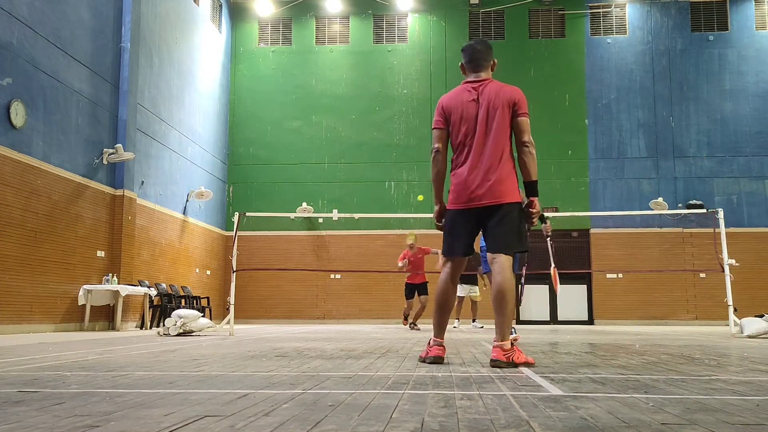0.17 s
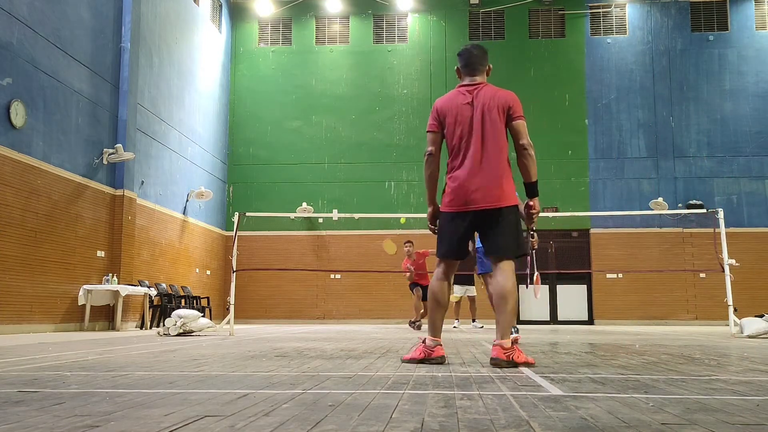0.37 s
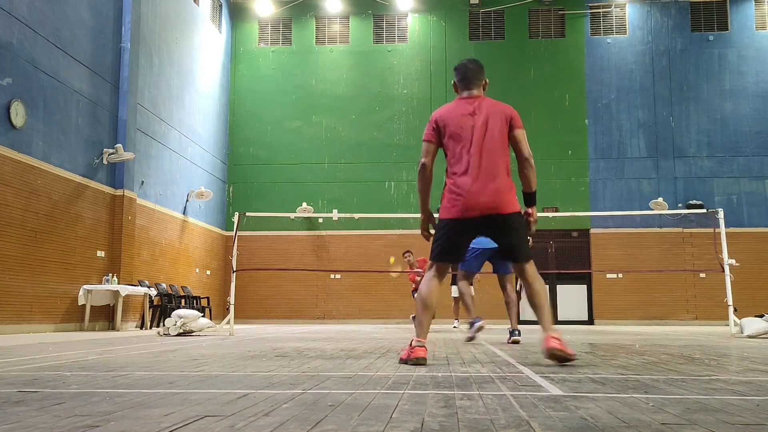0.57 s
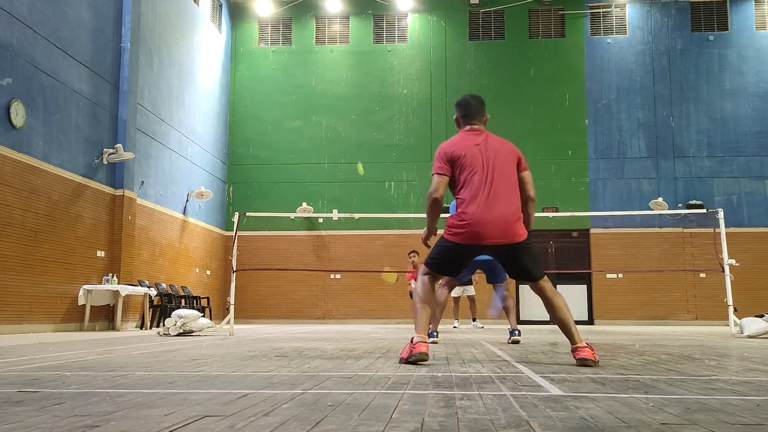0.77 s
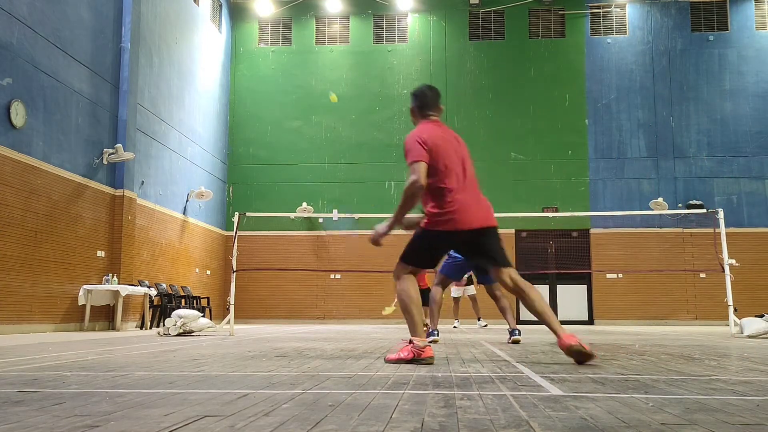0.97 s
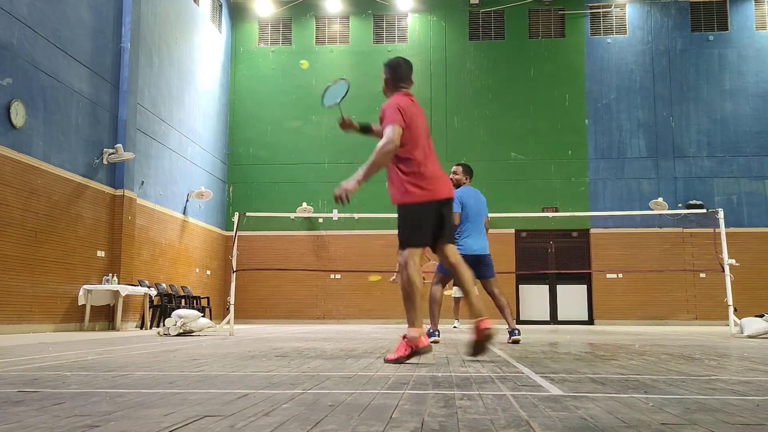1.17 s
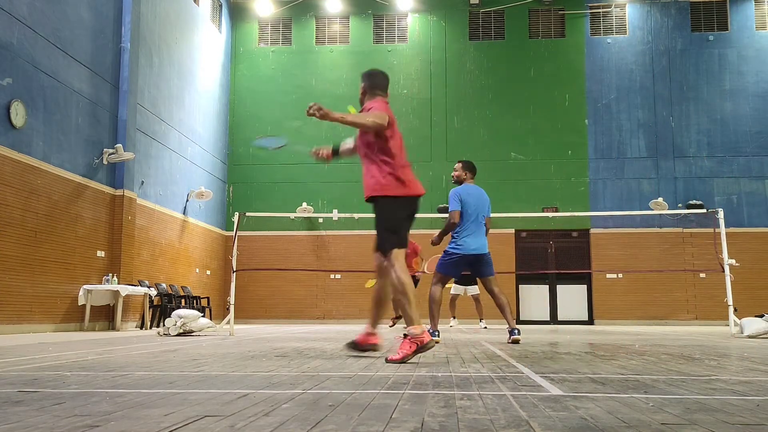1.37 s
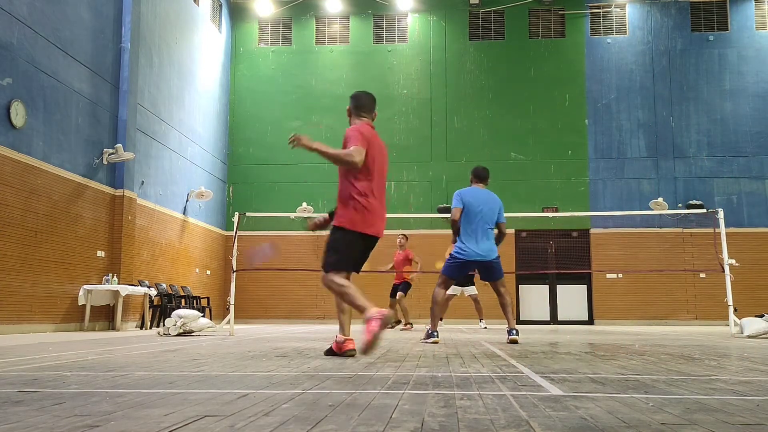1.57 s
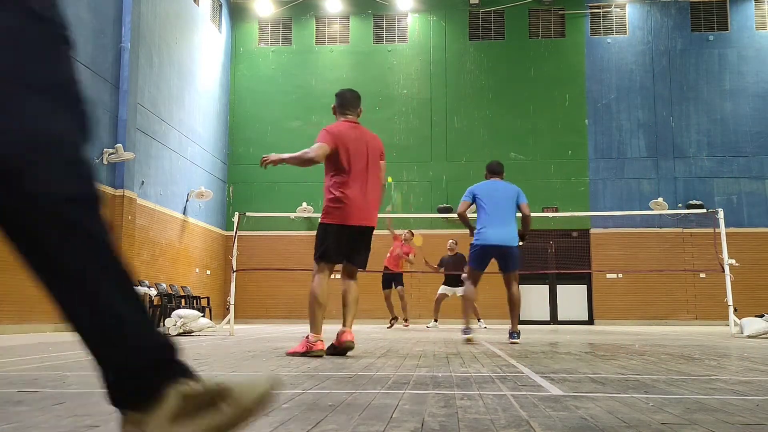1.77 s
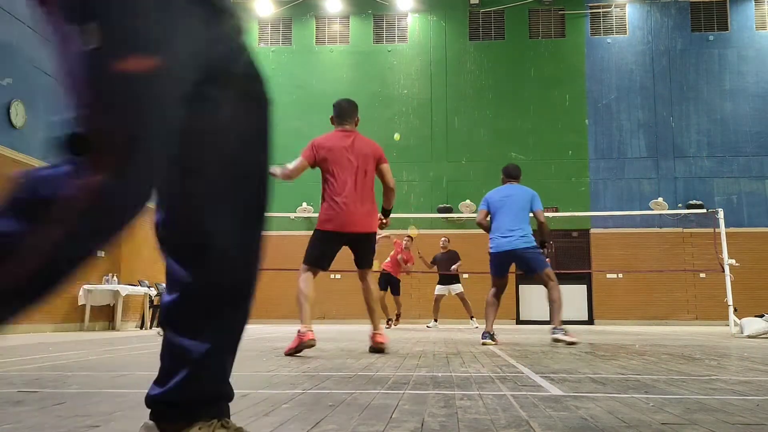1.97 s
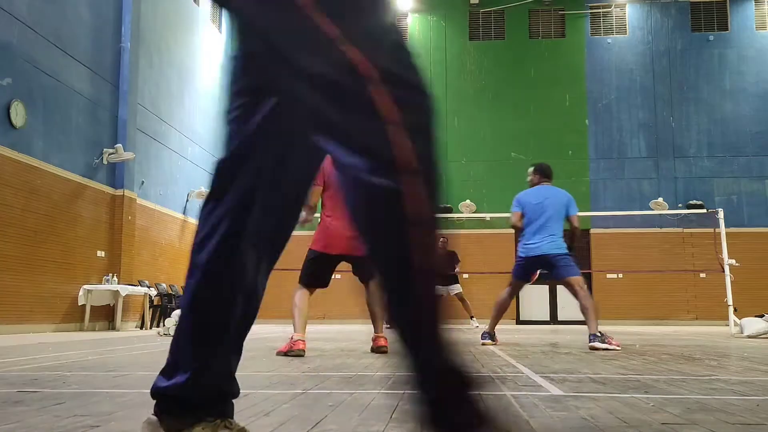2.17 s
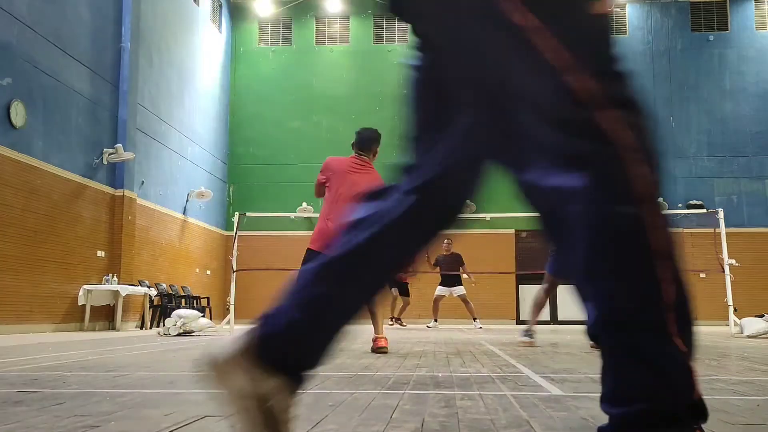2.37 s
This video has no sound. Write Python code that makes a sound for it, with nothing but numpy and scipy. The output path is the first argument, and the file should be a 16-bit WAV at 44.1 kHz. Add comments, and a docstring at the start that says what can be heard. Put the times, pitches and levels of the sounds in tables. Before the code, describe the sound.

A sharp badminton racket crack at about 0.27 seconds bounces off the far wall and lingers in a large, hard hall. Faint shoe taps and scuffs follow from 0.5 to 1.1. A second stroke, a woody pop, hits at 1.5. Footsteps thump at 1.6 to 1.7, then the strongest stamp lands close by at 2.05, with scuffing and smaller taps until the end, over low room rumble.

```python
"""Two badminton strokes in a big, hard-walled sports hall: noise cracks and decaying sines for the rackets' modes.
The far wall answers each stroke with one dull delayed copy; a long decaying noise tail is the hall's reverberation.
Shoes stamp, tap and scuff on the court: struck floor modes with slap and click noise, and swells of friction noise.
Low coloured room noise and a rumble lie underneath."""
import sys
import numpy as np
from scipy import signal
from scipy.fft import rfft, irfft
from scipy.io import wavfile
from scipy.ndimage import uniform_filter1d

SR = 44100
rng = np.random.default_rng(int(sys.argv[2]) if len(sys.argv) > 2 else 0)


def inscribe(sig):
    """Save sig as 16-bit PCM at rate SR to the path in sys.argv[1].

    A 1-D sig is mono; a 2-D sig holds one channel per row.
    Samples are clipped to [-1, 1] before scaling.
    """
    pcm = np.round(np.clip(np.atleast_2d(sig).T, -1, 1) * 32767)
    wavfile.write(sys.argv[1], SR, pcm.astype(np.int16))


N = 106986
T = np.arange(N) / SR   # time axis, s
WALL_S = .0795   # delay of the far wall's answer
FAST_RISE_S = 0.0012   # onset of the racket cracks and the sole clicks


def from_db(db):
    """Level to amplitude: 20 dB is a factor of ten."""
    return 10 ** (np.asarray(db) / 20)


def at_hz(points, hz):
    """Interpolation on a log-frequency axis, where equal steps are equal musical intervals."""
    f, value = np.transpose(points)
    return np.interp(np.log(np.maximum(hz, 1)), np.log(f), value)


def diffuse_spectrum():
    """Diffuse field: mixing independent mid and side noise sets the left-right correlation in each band."""
    # Each row: frequency in Hz, left-right correlation (1 is identical, 0 is independent).
    likeness = [(60, 1), (150, 0.99), (380, 0.86), (650, 0.53), (950, 0), (2400, 0), (15000, 0.16)]
    # Left-right balance. Each row: frequency in Hz, left minus right in dB.
    balance = [(100, -1), (300, 1), (900, -2.1), (2000, 0), (4000, 0), (15000, 0)]
    hz = np.arange(N // 2 + 1) * SR / N
    mid, side = rfft(rng.standard_normal((2, N)))
    alike = np.clip(at_hz(likeness, hz), -1, 1)
    common = np.sqrt(1 + alike) * mid
    opposed = np.sqrt(1 - alike) * side * [[1], [-1]]
    lean = from_db(at_hz(balance, hz) / 2 * [[1], [-1]])
    return hz, lean * (common + opposed) / np.sqrt(2)


def noise(spectrum):
    """Spectral shaping: white stereo noise weighted by a colour table, then scaled to rms 1."""
    hz, white = diffuse_spectrum()
    x = irfft(white * from_db(at_hz(spectrum, hz)), N)
    return x / x.std()


def blow(s, rise, t60):
    """Impact envelope: a linear rise during contact, then exponential decay by 60 dB in t60 seconds."""
    age = np.maximum(T - s, 0)
    return np.minimum(age / rise, 1) * from_db(-60 * np.maximum(age - rise, 0) / t60)


def ring(s, hz, rise, t60):
    """Modal vibration: one damped sine, its phase differing between two spaced microphones."""
    lag = np.array([[.00007], [0]])   # s: the sine reaches the left microphone later
    return blow(s, rise, t60) * np.sin(2 * np.pi * hz * (T - s - lag))


def strokes():
    """Impact excitation: broadband contact noise and racket modes; yields (direct sound, sound into the hall)."""
    # Each row: start in seconds, level of the ringing in dB, crack in dB, crack t60 in seconds,
    # swish in dB, crack's send into the hall in dB relative to the crack.
    stroke_table = [(0.2692, -21.5, -16.5, 0.034, -40.5, 9.5), (1.4934, -16.5, -23.5, 0.1, -55.5, 9.5)]
    # Modes of frame and strings, one list for each stroke.
    # Each row: frequency in Hz, level in dB relative to the ringing, t60 in seconds, relative hall send in dB.
    rackets = [
        [(260, -14.5, 0.15, 6), (371, -7.5, 0.05, 12), (509, -2.5, 0.034, 7.5), (796, -6, 0.032, 3.5),
         (1049, -9, 0.089, 0.5), (1206, -14, 0.025, 0), (1559, -10, 0.02, 13.5), (2170, -18.5, 0.15, 0),
         (2886, -17.5, 0.038, 9.5)],
        [(286, -15, 0.11, 2), (407.4, 1.5, 0.021, 3.5), (520, -5.5, 0.019, 7.5), (881, -4, 0.014, 5),
         (1514, -1, 0.037, -7), (1773, -6.5, 0.0069, -3), (1943, -8, 0.07, -7), (2225, -13, 0.14, -7),
         (2740, -21, 0.094, -8.5), (3250, -20, 0.065, -2.5)],
    ]
    # Colour of the cork meeting the strings. Each row: frequency in Hz, relative level in dB per Hz.
    crack_colour = [(60, -15.5), (250, -2), (450, 2), (1600, -5.5), (3200, -12), (4900, -22.5), (7000, -8),
                    (8900, -17), (10000, -17.5), (12000, -19.5), (15000, -15.5)]
    # Colour of the swish of the swing. Each row: frequency in Hz, relative level in dB per Hz.
    swish_colour = [(100, -25), (450, 14), (900, 0), (1500, -3), (5000, -14), (7000, 1), (9000, -11),
                    (15000, -10)]
    contact_s, swish_width_s = 0.0041, 0.026   # rise of the modes, 1/e half-width of the swish
    crack, air = noise(crack_colour), noise(swish_colour)
    for (s, ring_db, crack_db, crack_t60, swish_db, crack_hall_db), modes in zip(stroke_table, rackets):
        hit = from_db(crack_db) * crack * blow(s, FAST_RISE_S, crack_t60)
        sent = from_db(crack_hall_db) * hit
        for k, (hz, db, t60, hall_db) in enumerate(modes):
            polarity = (-1) ** k
            mode = polarity * from_db(ring_db + db) * ring(s, hz, contact_s, t60)
            hit = hit + mode
            sent = sent + from_db(hall_db) * mode
        # the swish peaks shortly before the impact
        swell = np.exp(-((T - s + swish_width_s / 2) / swish_width_s) ** 2)
        swish = from_db(swish_db) * air * swell
        yield hit + swish + wall_echo(hit), sent


def wall_echo(x):
    """Specular reflection: one delayed, weaker copy, without the deep bass and the treble."""
    band_hz = [302, 1000]
    band_pass = signal.butter(2, band_hz, "band", fs=SR, output="sos")
    dull = signal.sosfilt(band_pass, x + 1e-18)   # the offset keeps the filter clear of denormal numbers
    return from_db(-7) * np.array([np.interp(T - WALL_S, T, side, left=0) for side in dull])


def steps():
    """Structure-borne and airborne impact: floor modes, air slap, sole click; yields (direct, into the hall)."""
    # Each row: start in seconds, thud in dB, thud pitch in Hz, base t60 in seconds,
    # tilt of the floor modes in dB per octave above the thud pitch, slap in dB, sole click in dB,
    # click brightness in dB per octave, send into the hall in dB relative to the step.
    step_table = [(0.501, -31, 510, 0.028, 0, -42, -61, -3, -8),
                  (0.594, -32, 374.5, 0.085, -13, -40, -64, 0, -11),
                  (0.843, -35.5, 454.4, 0.054, 9.5, -34, -43, 3, 1.5),
                  (1.0613, -37.5, 398, 0.015, 7, -68, -37.5, -5, -14),
                  (1.5885, -18, 472, 0.027, -13, -56, -29, 2, 3),
                  (1.68, -26.5, 140.5, 0.074, 1, -56, -63, 0, -11),
                  (1.685, -27.5, 317, 0.026, 7.5, -51, -40, 0, 1),
                  (2.047, -12.5, 457.6, 0.022, -2, -24.5, -35, 3, 0.5),
                  (2.0845, -22, 441, 0.032, 0, -31.5, -41, -9, -1),
                  (2.172, -32, 400, 0.036, 0, -47, -44, 17, -17),
                  (2.285, -36, 353, 0.019, 8, -36, -37, 0, 4),
                  (2.352, -38, 437, 0.066, 12.5, -36, -68, -6, -14)]
    # Modes of the sprung wooden floor under a foot.
    # Each row: multiple of the thud pitch, level in dB relative to the thud, multiple of the base t60.
    floor_modes = [(.66, -19, 2.1), (1, -1.5, 1.48), (1.5, -6, 1.15), (2.35, -10.5, 2.3)]
    # Colour of the slap of air. Each row: frequency in Hz, relative level in dB per Hz.
    slap_colour = [(60, -18), (250, 0), (420, 9.5), (700, 14.5), (1080, 8.5), (1350, 0.5), (2000, 6.5),
                   (3000, -17), (4200, -5), (6000, -32), (15000, -17.5)]
    # Colour of the sole click before its brightness. Each row: frequency in Hz, relative level in dB per Hz.
    click_colour = [(300, -41), (2000, -1), (3300, 5.5), (4700, 0.5), (5800, -7), (6900, 17), (7900, -5),
                    (12000, -3), (13300, -9), (15000, -7)]
    step_rise_s, slap_t60_s, click_t60_s = 0.0025, 0.092, 0.046
    slap = noise(slap_colour)
    for s, thud_db, hz, t60, tilt_db, slap_db, click_db, bright_db, hall_db in step_table:
        click = noise([(f, db + bright_db * np.log2(f)) for f, db in click_colour])
        boards = 0
        for k, (ratio, db, stretch) in enumerate(floor_modes):
            level = (-1) ** k * from_db(db + tilt_db * np.log2(ratio))   # alternating polarity
            boards = boards + level * ring(s, hz * ratio, step_rise_s, t60 * stretch)
        step = from_db(thud_db) * boards
        step = step + from_db(slap_db) * slap * blow(s, step_rise_s, slap_t60_s)
        step = step + from_db(click_db) * click * blow(s, FAST_RISE_S, click_t60_s)
        yield step, from_db(hall_db) * step


def scuffs():
    """Sliding friction: many tiny contacts add up to bright noise, here in Gaussian swells."""
    # Soles and clothes brushing. Each row: centre in seconds, level in dB, 1/e half-width in seconds.
    scuff_table = [(0.085, -56.5, 0.019), (0.71, -56.5, 0.042), (0.887, -49, 0.05), (1.01, -58, 0.025),
                   (1.407, -55, 0.0082), (1.643, -39.5, 0.027), (1.986, -40, 0.017), (2.087, -37.5, 0.049),
                   (2.381, -48, 0.037)]
    # Colour of the friction noise. Each row: frequency in Hz, relative level in dB per Hz.
    friction_colour = [(500, 16.5), (3000, 13), (4800, 1), (7000, 13.5), (9000, 6.5), (12000, 1),
                       (15000, 9.5)]
    swells = sum(from_db(db) * np.exp(-((T - s) / width) ** 2) for s, db, width in scuff_table)
    return noise(friction_colour) * swells


def hall(x):
    """Reverberation: convolution with a noise impulse response whose bands decay sooner in the treble."""
    # Decay of the hall. Each row: band centre in Hz, t60 in seconds.
    decays = [(100, 22.5), (400, 4), (1000, 4), (2500, 3.5), (7000, 2), (15000, 1)]
    # Colour of the tail before decay. Each row: frequency in Hz, relative level in dB.
    tail_colour = [(60, -16.5), (150, -13), (220, -7), (290, -7), (380, -1.5), (490, -1.5), (700, 1.5),
                   (920, 3), (1050, 6), (1250, -1), (2000, 2), (3200, -1), (5000, -2), (7000, -2.5),
                   (10000, -6), (15000, -7)]
    hz, white = diffuse_spectrum()
    white = white * from_db(at_hz(tail_colour, hz))
    centres = np.array(decays)[:, 0]
    tail = 0
    for (_, t60), band in zip(decays, np.eye(len(centres))):
        share = at_hz(np.transpose([centres, band]), hz)   # triangular, overlapping bands
        tail = tail + irfft(white * share, N) * from_db(-60 * T / t60)
    # the tail is thinner until the far wall answers: its gain climbs from -6.75 to -2.25 dB
    build_s = 0.012
    filled = .5 + .5 * np.tanh((T - WALL_S) / build_s)
    build_up = from_db(-4.5 * (1.5 - filled))
    tail = roughen(tail) * build_up * 2 / np.sqrt(SR)
    return signal.fftconvolve(x, tail, axes=1)[:, :N]


def roughen(tail):
    """Random gain texture: smoothed random gains make the reverberation tail slightly patchy in time and frequency."""
    spread_db = 2.5   # standard deviation of the gains
    cells = signal.stft(tail, SR, nperseg=512)[2]
    chance = uniform_filter1d(rng.standard_normal(cells.shape[1:]), size=7, axis=1)   # along time
    chance = uniform_filter1d(chance, size=2, axis=0)   # along frequency
    gain = from_db(spread_db * chance / chance.std())
    gain = gain / np.sqrt(np.mean(gain ** 2, axis=1, keepdims=True))   # mean square 1 in each bin
    return signal.istft(cells * gain)[1][:, :N]


def room_noise():
    """Stationary background: a diffuse noise of fixed colour whose level drifts slowly."""
    # Each row: frequency in Hz, relative level in dB per Hz.
    room_colour = [(15, -72), (25, -47), (60, -30), (90, -9), (110, -5.5), (135, -5.5), (170, -3.5),
                   (280, -4), (400, -9.5), (800, -12), (1450, -19.5), (2060, -21), (3000, -25.5),
                   (4900, -44), (6600, -31.5), (9000, -45.5), (15500, -40)]
    # Each row: time in seconds, level in dB.
    room_level = [(0, -45.5), (1.4, -46), (1.9, -42.5), (2.43, -44)]
    return noise(room_colour) * from_db(np.interp(T, *np.transpose(room_level)))


def rumble():
    """Low-frequency noise as someone walks close by: a fixed colour under a slow level envelope."""
    # Each row: frequency in Hz, relative level in dB per Hz.
    rumble_colour = [(25, -43), (70, -36), (110, -11.5), (135, -3), (190, -5), (300, -0.5), (900, -19),
                     (4000, -64)]
    # Each row: time in seconds, level in dB.
    rumble_level = [(0, -67), (1.45, -57.5), (1.7, -42), (2.05, -46), (2.43, -52)]
    return noise(rumble_colour) * from_db(np.interp(T, *np.transpose(rumble_level)))


def scene():
    """Superposition: direct play on the court, its reverberation and the background add linearly."""
    direct, sent = (sum(part) for part in zip(*strokes(), *steps()))
    brush = scuffs()
    reverberation = hall(sent + from_db(10) * brush)   # scuffs enter the hall at +10 dB
    return direct + brush + reverberation + room_noise() + rumble()


def record(dry):
    """Band limiting: a steep elliptic low-pass removes the top."""
    low_pass = signal.ellip(10, .1, 80, 15550, fs=SR, output="sos")   # order, ripple dB, stop dB, Hz
    return signal.sosfilt(low_pass, dry)


dry = scene()
out = record(dry)
inscribe(out)
```